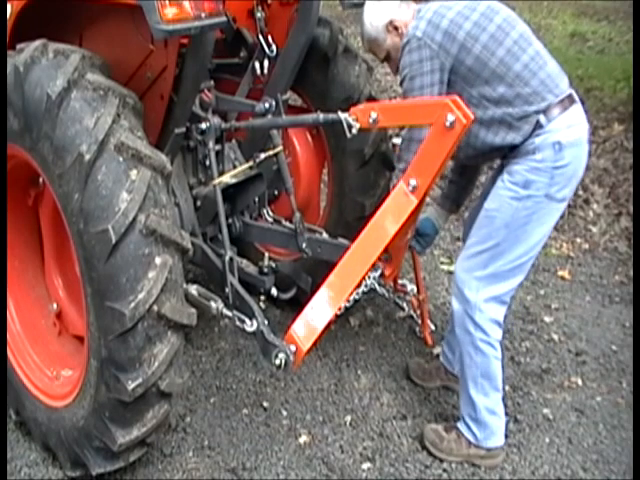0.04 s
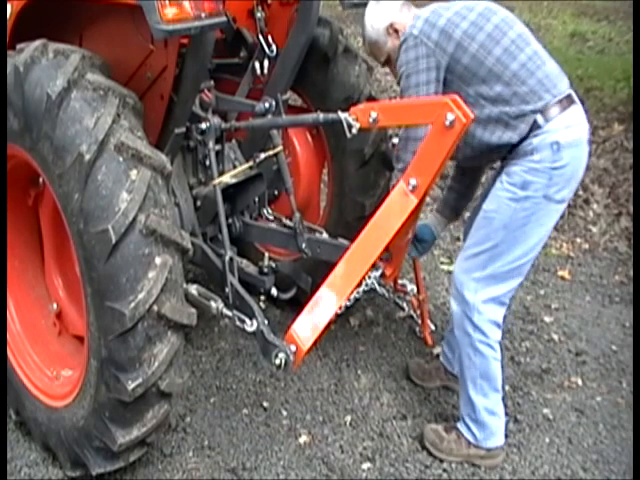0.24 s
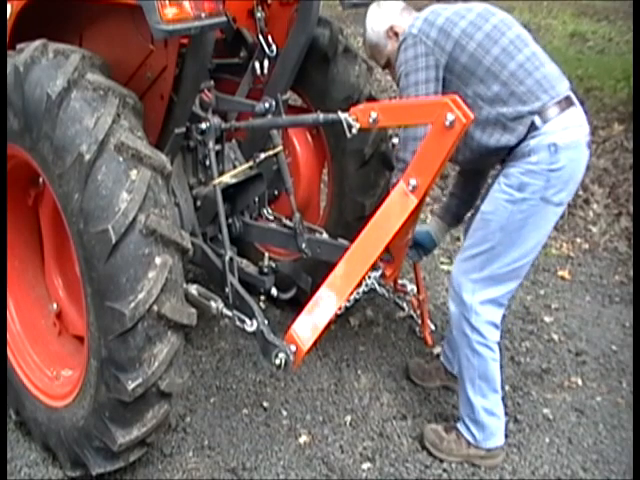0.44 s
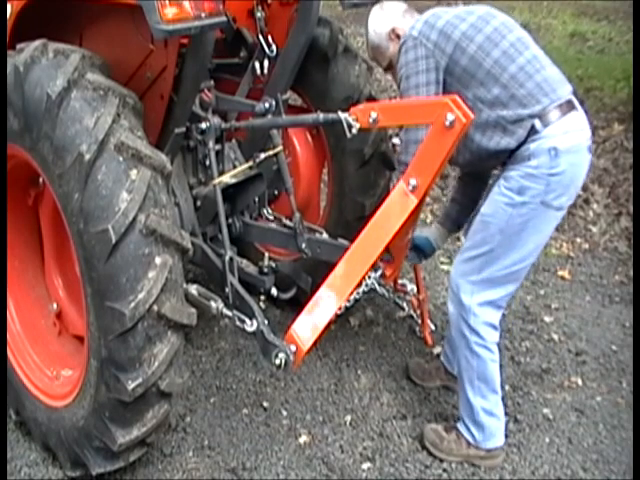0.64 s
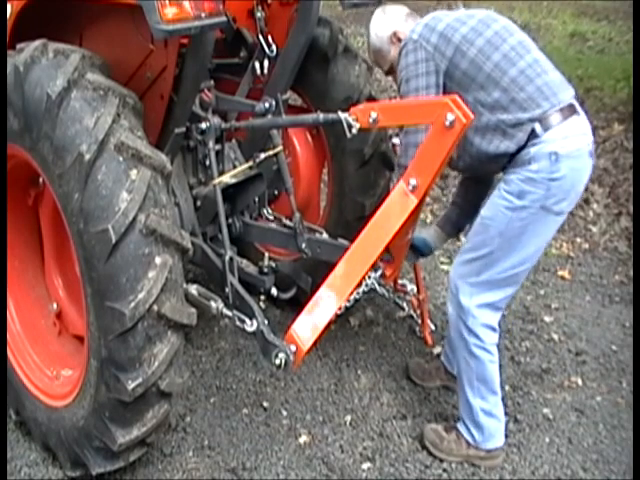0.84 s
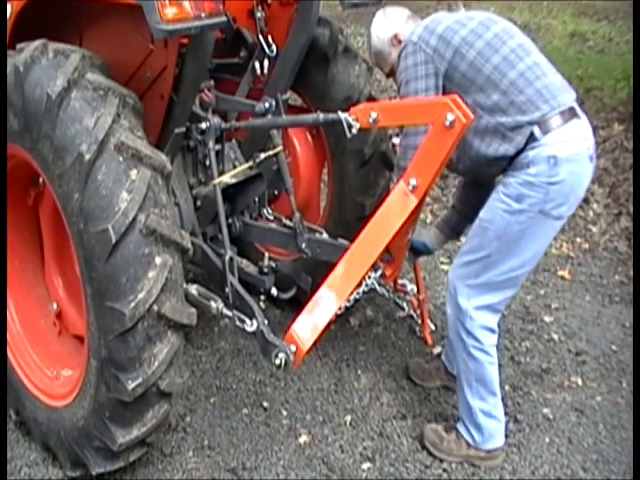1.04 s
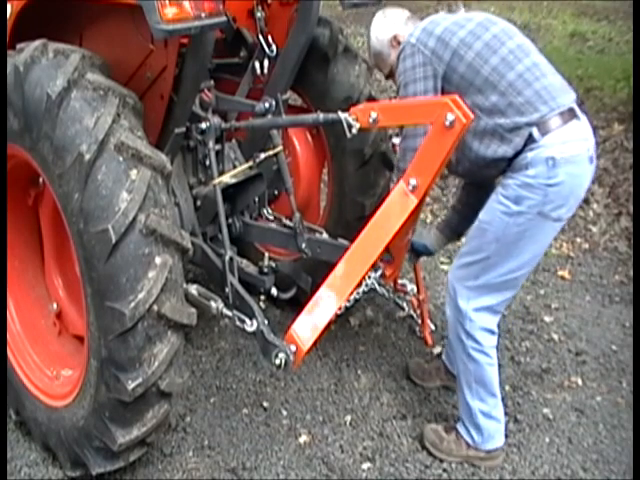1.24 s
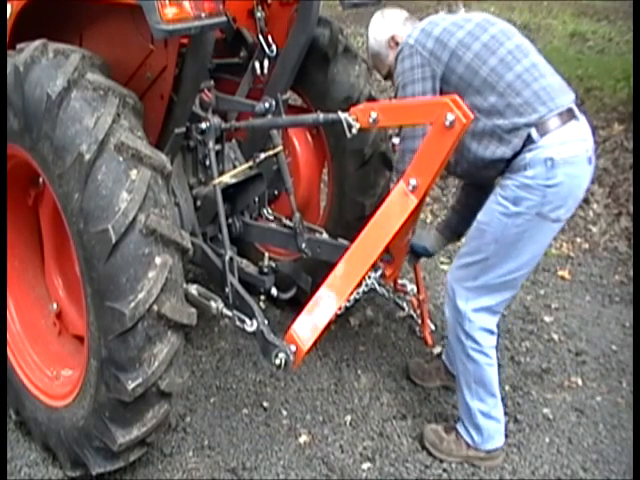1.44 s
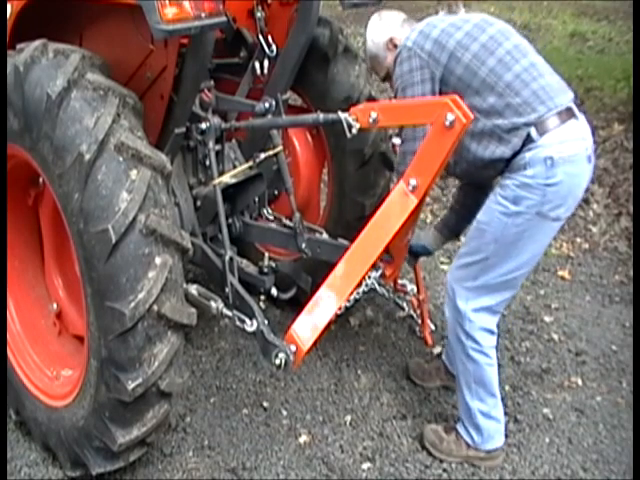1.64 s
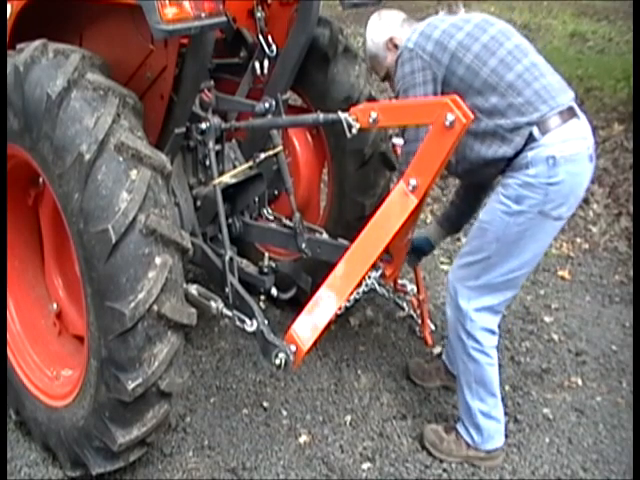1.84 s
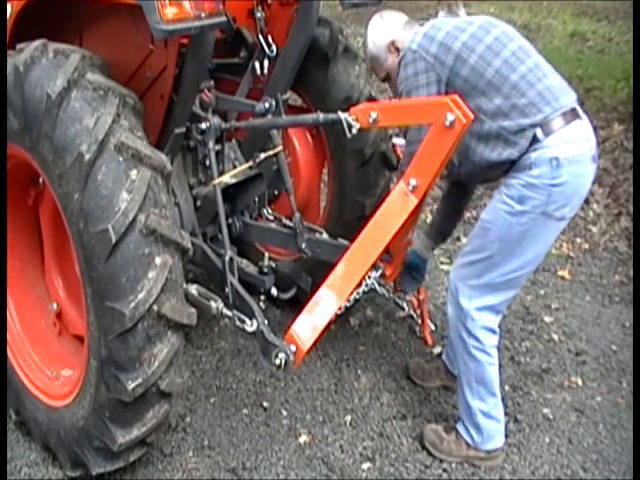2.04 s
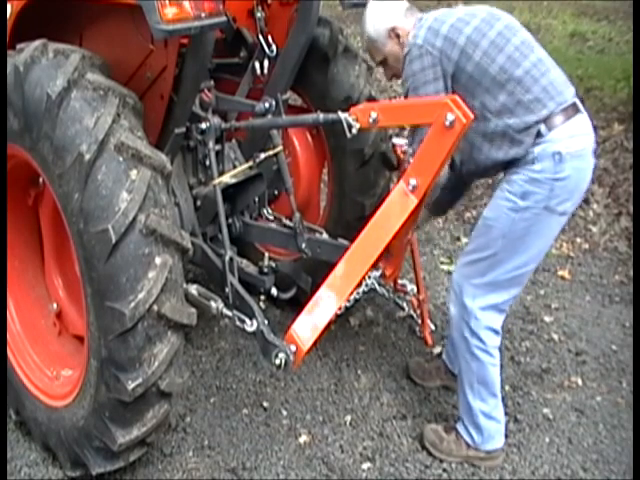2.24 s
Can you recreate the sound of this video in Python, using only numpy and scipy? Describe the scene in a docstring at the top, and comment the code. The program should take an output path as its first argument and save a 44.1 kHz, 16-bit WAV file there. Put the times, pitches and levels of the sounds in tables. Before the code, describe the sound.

A steel pin squeaks, then tractor hitch hardware clinks, growing louder toward the end.

```python
"""A tractor's hitch outdoors, a little right of the microphone, over a quiet country floor.
Far birds whistle at the start. At 0.2 s a dry steel pin squeaks as it is worked in, the frame groans,
and two clinks follow. Light wind touches the microphone; soft rubbing sets the lift arm humming,
and the birds call again. From 1.4 s three more clinks, each louder, ring the arm, the pins and
the frame. Last come a few scuffs, more wind and one far whistle."""
import sys
import numpy as np
from scipy import signal
from scipy.io import wavfile
from scipy.ndimage import uniform_filter1d

SR = 44100
rng = np.random.default_rng(int(sys.argv[2]) if len(sys.argv) > 2 else 0)


def int16_out(signal):
    """Quantize to a 16-bit WAV file."""
    q = np.round(np.clip(np.atleast_2d(signal).T, -1, 1) * 32767)
    wavfile.write(sys.argv[1], SR, q.astype(np.int16))


N = 101429
T = np.arange(N) / SR

# Blows of steel on steel: (time [s], clatter [dB], arm ring [dB], pin ring [dB],
# contact dulls above [Hz], frame ring [dB], ring time factor [ratio])
CLINKS = [(0.3299, -22, -33, -28.5, 3430, -37, 0.61), (0.474, -26, -27.5, -37.5, 4580, -46, 0.76),
          (1.4396, -28.5, -30.5, -38, 7200, -44, 1.17), (1.7354, -13.5, -25, -20.5, 5770, -33, 0.87),
          (1.9898, -7.5, -27, -21, 13600, -21.5, 1.29)]
# Scuffs and rustles, and the bright hiss of the squeak:
# (time [s], length [s], level [dB], tilt [dB/octave])
SCUFFS = [(0.155, 0.39, -42.5, -3.5), (0.225, 0.024, -22.5, 2.5), (0.846, 0.045, -50, -10.5),
          (1.032, 0.014, -50, -2), (1.107, 0.079, -53.5, -1.5), (1.427, 0.031, -43.5, -10),
          (1.472, .12, -38, -5.5), (1.606, .17, -36.5, -9.5), (1.648, 0.011, -32, -10),
          (2.107, 0.049, -35.5, -5), (2.16, 0.1, -46, -3)]
CONTACT_S, LAG_CYCLES = .011, 4.317   # parts chatter at each clink; low pitches start later


def amp(db):
    return 10 ** (np.asarray(db) / 20)


def rms_one(x):
    return x / np.sqrt(np.mean(x ** 2) + 1e-20)


def at_hz(points, hz):
    """Reads a (frequency, value) curve on a log frequency axis."""
    frequencies, values = np.transpose(points)
    return np.interp(np.log(hz), np.log(frequencies), values)


def phase_of(hz):
    return 2 * np.pi * np.cumsum(hz) / SR


def drift(hz):
    """Smooth random wander, rms 1."""
    r = np.exp(-2 * np.pi * hz / SR)
    return rms_one(signal.lfilter([1], [1, -2 * r, r * r], rng.standard_normal(N + SR))[SR:])


def swell(start, length):
    """An arch that rises quickly and falls more slowly."""
    return np.sin(np.pi * np.clip((T - start) / length, 0, 1) ** .6)


def fade(start, length):
    """Rises in a quarter of the length, then dies away."""
    u = np.maximum(T - start, 0) / length * 4
    return u * np.exp(1 - u)


def bandpass(x, low, high):
    return signal.sosfilt(signal.butter(2, [low, high], "band", fs=SR, output="sos"), x)


def bands(pair):
    """Third-octave bands with their centres, cut from two sources in turn."""
    edges = 30 * 2 ** np.arange(0, 9.4, 1 / 3)
    for k, (low, high) in enumerate(zip(edges, edges[1:])):
        yield np.sqrt(low * high), bandpass(pair[k % 2], low, high)


def grit(per_s):
    """Two trains of uneven tiny contacts, rms 1."""
    sizes = amp(3 * np.minimum(rng.exponential(1, (2, N)), 3)) * rng.choice([-1, 1], (2, N))
    return rms_one(sizes * (rng.random((2, N)) < per_s / SR))


def dull(hz, above_hz):
    """Low-pass gain of a contact."""
    return 1 / np.sqrt(1 + (hz / above_hz) ** 6)


def ring(force, hz, t60):
    """One damped mode driven by a force."""
    r, w = amp(-60 / (t60 * SR)), 2 * np.pi * hz / SR
    return signal.lfilter([.5, 0, -.5], [1, -2 * r * np.cos(w), r * r], force + 1e-18)


def at_hitch(x, hz):
    """Places a sound at the hitch, a little right of the microphone."""
    # Stereo balance: (frequency [Hz], left minus right [dB])
    balance = [(500, 1.1), (2800, -4), (11000, -0.6)]
    return x * amp(at_hz(balance, hz) * np.array([[.5], [-.5]]))


def country_floor(level_db=-56.5, likeness=.59):
    """Far traffic, leaves and microphone hiss, partly alike left and right."""
    # Background spectrum: (frequency [Hz], relative density [dB])
    spectrum = [(30, -9.5), (120, -3.5), (585, -3), (1440, -9), (1950, -13), (2700, -13.5), (9000, -23),
                (16000, -39.5)]
    out = 0
    for hz, (mid, side) in bands(rng.standard_normal((2, 2, N))):
        stereo = np.sqrt(1 + likeness) * mid + np.sqrt(1 - likeness) * side * [[1], [-1]]
        out += amp(at_hz(spectrum, hz)) * stereo
    return amp(level_db) * rms_one(out)


def far_birds():
    """Thin, wavering whistles in the distance, each sliding down a little."""
    # Calls: (time [s], length [s], start pitch [Hz], end pitch [Hz], level [dB])
    calls = [(-.06, .3, 7900, 7830, -52.5), (-.04, .19, 6750, 6700, -64), (1.0, .3, 7250, 6750, -70),
             (1.02, .13, 2750, 2450, -63), (1.1, .04, 1810, 1800, -54), (2.24, .1, 5100, 5080, -65)]
    out = 0
    for start, length, start_hz, end_hz, db in calls:
        pitch = np.interp(T, [start, start + length], [start_hz, end_hz]) * (1 + .004 * drift(60))
        out += amp(db + 2 * drift(40)) * swell(start, length) * np.sin(phase_of(pitch))
    return out


def microphone_wind():
    """Lumpy low noise on the microphone ports, stronger on the left."""
    # Gusts: (time [s], length [s], level [dB])
    gusts = [(0.589, 0.11, -41.5), (0.761, 0.13, -50.5), (1.906, 0.34, -53.5), (2.155, 0.25, -58.5)]
    envelope = sum(amp(db) * swell(start, length) ** 2 for start, length, db in gusts)
    envelope *= amp(3 * drift(25))
    rumble = bandpass(rng.standard_normal((2, N)), 55, 137.5)
    rumble[1] -= .5 * rumble[0]   # the right side partly opposes the left
    return rms_one(rumble) * envelope * amp([[3], [-4]])


def frame_groan(start_s=.245, length_s=.15):
    """The frame groans on two unsteady low tones after the squeak."""
    # Groan tones: (frequency [Hz], level [dB])
    partials = [(212, -48.5), (427, -47.5)]
    out = 0
    for hz, db in partials:
        envelope = amp(db + 2.3 * drift(39)) * swell(start_s, length_s)
        out += envelope * np.sin(phase_of(hz * (1 + .092 * drift(43))))
    return out


def pin_squeak(rough_hz=340, echo_db=-11, echo_t60_s=.24):
    """A dry pin shrieks, octave first, then the fundamental too; it scatters off the tractor body."""
    # Course of the squeak: (time [s], pitch [Hz], fundamental [dB], octave [dB])
    course = [(0.19, 5940, -94, -80), (0.214, 6240, -92, -20.5), (0.224, 5900, -24.5, -29.5),
              (0.231, 5876, -13, -19.5), (.236, 6130, -12, -23.5), (0.248, 6590, -18, -43),
              (.258, 6570, -20, -53.5), (0.262, 6560, -40, -59)]
    times, *columns = np.transpose(course)
    pitch, fundamental_db, octave_db = [np.interp(T, times, column) for column in columns]
    phase = phase_of(pitch * (1 + .015 * drift(rough_hz)))
    flutter = 1 + .75 * np.tanh(drift(rough_hz))
    direct = amp(fundamental_db) * flutter * np.sin(phase) + amp(octave_db) * np.sin(2 * phase)
    direct *= (T > times[0]) & (T < times[-1])
    scatter = rng.standard_normal(SR // 2) * amp(-60 * T[:SR // 2] / echo_t60_s)
    scatter /= np.sqrt(np.sum(scatter ** 2))
    echo = signal.fftconvolve(uniform_filter1d(direct, size=3), scatter)[:N]
    return at_hitch(direct + amp(echo_db) * echo, 6200)


def clatter_and_scuffs(crack_t60_s=.035, tail_db=-1.5):
    """Loose steel chatters at each clink, then dies away, treble first; scuffs and hiss swell and fade."""
    # Colour of the contacts: (frequency [Hz], relative density [dB])
    spectrum = [(200, -67), (350, -26), (1150, -7.5), (2000, -3.5), (4750, -4.5), (9550, -7),
                (16000, -23.5)]
    # Decay of the clatter: (frequency [Hz], t60 [s])
    tail_t60 = [(300, 0.3), (2000, 0.23), (12000, 0.15)]
    scuffs = [(fade(start, length), db, tilt) for start, length, db, tilt in SCUFFS]
    contacts = grit(per_s=14000)
    out = 0
    for hz, (mid, side) in bands(np.stack([contacts, contacts[:, ::-1]], axis=1)):
        power = sum(shape * amp(db + tilt * np.log2(hz / 2500)) ** 2 for shape, db, tilt in scuffs)
        for start, db, _, _, above_hz, *_ in CLINKS:
            age = np.maximum(T - start, 0)
            onset = np.minimum(age * hz / LAG_CYCLES, 1) ** 2
            crack = amp(-60 * np.maximum(age - CONTACT_S, 0) / crack_t60_s)
            tail = amp(tail_db - 60 * age / at_hz(tail_t60, hz))
            power += (amp(db) * dull(hz, above_hz) * onset) ** 2 * (crack ** 2 + tail ** 2)
        stereo = mid + amp(-18.5) * side * [[1], [-1]]
        out += at_hitch(stereo * np.sqrt(power) * amp(at_hz(spectrum, hz)), hz)
    return out


def steel_part(modes, level_column, rubbing, scatter_db=2.5, rattle_db=5, rattle_hz=62):
    """Rubbing feeds each mode of a part, and every clink strikes it twice with uneven force."""
    out = 0
    for hz, mode_db, t60 in modes:
        ringing = ring(rubbing * dull(hz, 2700) / 10, hz, t60)
        for clink in CLINKS:
            start, above_hz, ring_factor = int(clink[0] * SR), clink[4], clink[6]
            touch_s = CONTACT_S * rng.random(2) * [.5, 1] + LAG_CYCLES / hz
            force = np.zeros(SR // 2)
            force[(touch_s * SR).astype(int)] = amp(scatter_db * rng.standard_normal(2)) * [1, .5]
            struck = ring(force, hz, t60 * ring_factor)[:N - start]   # each clink shortens or lengthens the ring
            ringing[start:start + len(struck)] += amp(clink[level_column]) * dull(hz, above_hz) * struck
        waver_db = rattle_db * np.tanh(drift(rattle_hz))   # loose parts make the ring waver
        out += at_hitch(amp(mode_db + waver_db) * ringing, hz)
    return out


def ringing_hitch(rub_db=-13.5):
    """Lift arm, pins and frame ring under the clinks and under the tiny slips of rubbing."""
    # Modes of the lift arm, the pins and the frame they sit in: (frequency [Hz], level [dB], t60 [s])
    arm_modes = [(1405, -2, .09), (1442, -1, .145)]
    pin_modes = [(2350, -6, .08), (2895, -2, .06), (3540, -4, .07), (3714, -4.5, .26), (3835, -3, .09),
                 (4002, 1, .06), (4690, 4, .04), (5090, -7, .1), (5622, -5, .09), (6650, -7, .07),
                 (8720, -8, .09)]
    frame_modes = [(310, -26, .2), (485, -18, .3), (565, -24, .35), (858, -17, .35), (1066, -13, .2),
                   (1770, 6, .045), (1895, -14, .3), (2562, -15, .22), (3230, -8, .15), (5486, -10, .13),
                   (5892, -11, .2), (6230, -7, .22), (9211, -12, .16)]
    # Slow pushes that set the arm humming: (time [s], length [s], relative level [dB])
    nudges = [(0.577, 0.03, -65), (0.747, 0.046, -56), (0.866, 0.061, -55.5), (1.492, 0.076, -55),
              (1.592, 0.24, -59)]
    slips = grit(per_s=2300)
    pushes = sum(amp(db) * swell(start, length) for start, length, db in nudges)
    # the dull scuffs also ring the pins and frame
    rubs = sum(amp(db + rub_db) * swell(start, length) for start, length, db, tilt in SCUFFS if tilt < 0)
    arm = steel_part(arm_modes, level_column=2, rubbing=slips[0] * pushes * 2)
    pins = steel_part(pin_modes, level_column=3, rubbing=slips[1] * rubs)
    frame = steel_part(frame_modes, level_column=5, rubbing=slips[0] * rubs * .5)
    return arm + pins + frame


def scene():
    """The hitch and the country around it, as they reach the stereo microphone."""
    hitch = ringing_hitch() + clatter_and_scuffs() + pin_squeak()
    return hitch + far_birds() + frame_groan() + country_floor() + microphone_wind()


def record(dry):
    """The recorder rounds the peaks and cuts the top at 16.4 kHz."""
    lowpass = signal.cheby2(16, 80, 16400, fs=SR, output="sos")
    return signal.sosfilt(lowpass, np.tanh(dry))


dry = scene()
out = record(dry)
int16_out(out)
```